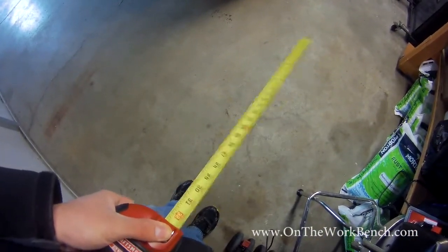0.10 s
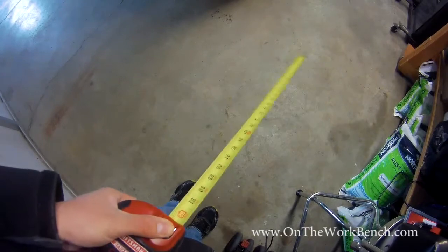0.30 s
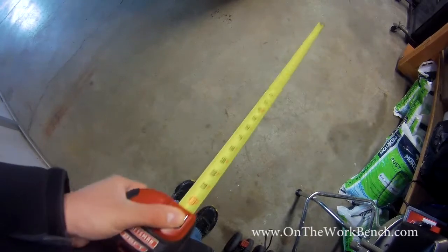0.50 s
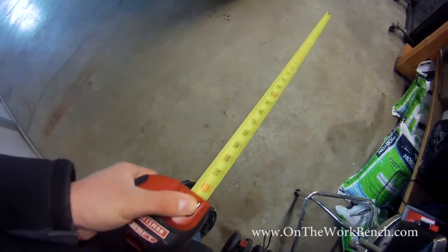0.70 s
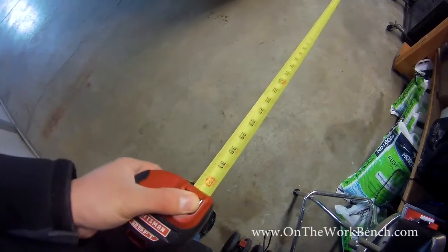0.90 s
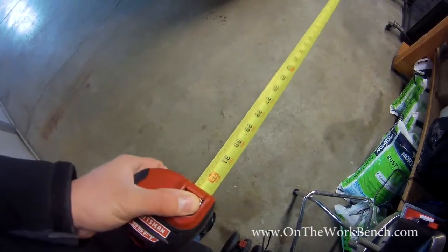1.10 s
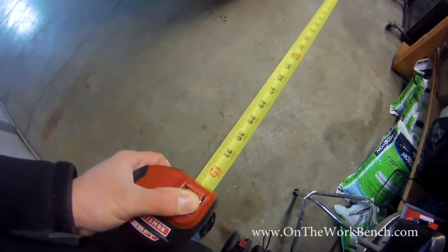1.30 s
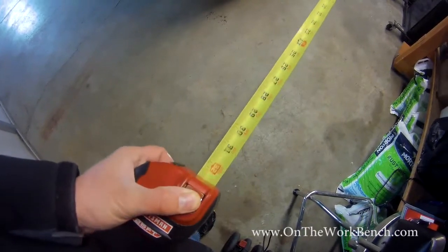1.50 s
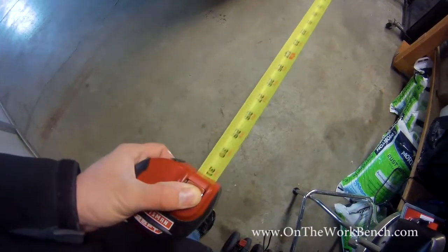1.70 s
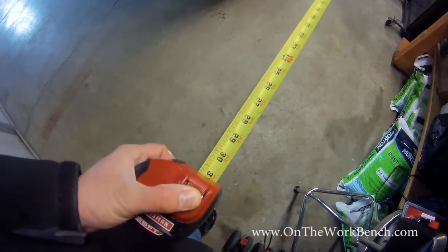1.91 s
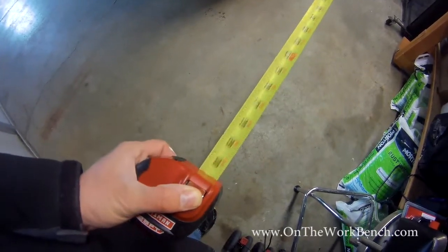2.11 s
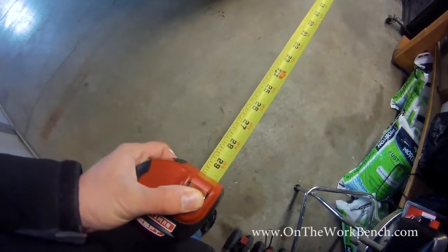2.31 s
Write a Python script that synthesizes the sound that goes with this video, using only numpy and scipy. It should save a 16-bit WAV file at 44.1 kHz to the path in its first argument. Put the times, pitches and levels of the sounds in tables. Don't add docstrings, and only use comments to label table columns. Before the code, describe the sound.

Thin metal tape blade wobbles and whips with bright snapping kinks over a low flexing drone, settles to faint ticks, then rubs home in two quiet, short spurts; concrete garage, short echo, steady hiss, hand rumble.

```python
import sys
import numpy as np
from scipy import signal
from scipy.fft import rfft, irfft, next_fast_len
from scipy.io import wavfile
from scipy.ndimage import uniform_filter1d, map_coordinates

SR = 44100
rng = np.random.default_rng(int(sys.argv[2]) if len(sys.argv) > 2 else 0)


def linear_from_db(decibels):
    return 10 ** (np.asarray(decibels, float) / 20)


def waveform_to_disk(signal):
    frames = np.transpose(np.atleast_2d(signal))
    scaled = np.clip(frames, -1, 1) * 32767
    samples = np.round(scaled).astype(np.int16)
    wavfile.write(sys.argv[1], SR, samples)


N = 110250


def unit(x):
    return x / np.sqrt(np.mean(x ** 2) + 1e-20)


def along(points, hz):
    f, v = np.transpose(points)
    return np.interp(np.log(hz + 1), np.log(f + 1), v)


def wobble(rate):
    knots = rng.standard_normal(int(N * rate / SR) + 4)
    return map_coordinates(knots, [np.arange(N) * rate / SR])


def filtered(x, response):
    m = next_fast_len(N + 8192)
    return irfft(rfft(x, m) * response(np.fft.rfftfreq(m, 1 / SR)), m)[:N]


def shaped_noise(points):
    return unit(filtered(rng.standard_normal(N), lambda hz: linear_from_db(along(points, hz))))


def resonances(hz, peaks, share):
    power = sum(linear_from_db(2 * db) / (1 + (2 * (hz - c) / width) ** 2) for c, width, db in peaks)
    return np.sqrt(1 + share * power)


def grains(rate, hz, spread, cycles, size_db):
    u = rng.random((int(N / SR * 3000), 4))
    k = np.arange(160)
    pitch = np.clip(hz * np.exp(spread * (2 * u[:, 1:2] - 1)), 1900, 14000) / SR
    size = linear_from_db(np.minimum(-size_db * np.log(u[:, 2:3]), 9))
    size = size * np.clip((rate / 3000 - u[:, 3:]) * 50, 0, 1)
    ring = size * np.sin(2 * np.pi * pitch * k) * np.exp(-k * pitch / cycles)
    ring = ring * np.minimum(k * pitch / 2, 1)
    place = (u[:, :1] * N).astype(int) + k
    return unit(np.bincount(place.ravel(), ring.ravel(), N + 160)[:N])


def patchy(x, depth_db, span_bins, span_frames):
    z = signal.stft(x, nperseg=128)[2]
    field = uniform_filter1d(rng.standard_normal(z.shape), span_bins, 0)
    field = uniform_filter1d(field, span_frames, 1)
    return unit(signal.istft(z * linear_from_db(depth_db * unit(field)), nperseg=128)[1][:N])


def swells(rows):
    t = np.arange(N) / SR
    return sum(linear_from_db(db) * np.exp(-.5 * ((t - s) / np.where(t < s, rise, fall)) ** 2)
               for s, db, rise, fall in rows)


def add(track, s, sound):
    part = track[round(s * SR):][:len(sound)]
    part += sound[:len(part)]


# frequency in Hz, level in dB per Hz.
HISS_SPECTRUM = [(15, -10.5), (30, -3), (210, -11), (430, -17), (800, -24), (2200, -31), (5000, -36),
                 (12500, -38.5), (15200, -44.5)]
# time in seconds, gain in dB.
FLOOR_GAIN = [(0, 1), (0.899, 0.5), (1.15, -2), (1.5, -3), (1.7, 0), (2.0, -0.5), (2.5, 0.5)]


def hiss():
    t = np.arange(N) / SR
    noise = unit(filtered(rng.standard_normal(N), lambda hz: linear_from_db(along(HISS_SPECTRUM, hz)) * (hz > 12)))
    whine = np.sin(2 * np.pi * 13717 * t + .4 * wobble(20)) * linear_from_db(1.5 * wobble(14))
    s, db = np.transpose(FLOOR_GAIN)
    return linear_from_db(-61.5 + np.interp(t, s, db) + .4 * wobble(1.9)) * noise + linear_from_db(-84) * whine


# frequency in Hz, decay time t60 in seconds.
GARAGE_T60 = [(300, 0.66), (2500, .4), (12000, 0.21)]


def garage(x):
    hz, t, z = signal.stft(rng.standard_normal(SR // 2), SR, nperseg=256)
    decay = linear_from_db(-60 * t / along(GARAGE_T60, hz)[:, None])
    tail = signal.istft(z * decay, SR, nperseg=256)[1]
    delayed = np.pad(x, (300, 0))
    return signal.fftconvolve(delayed, tail / np.linalg.norm(tail))[:N]


# time in seconds, level in dB.
GRIP_LEVEL = [(0, -70), (.2, -67.5), (.42, -59.5), (.75, -62.5), (1.0, -70.5), (1.5, -80.5), (1.9, -64.5),
              (2.5, -75.5)]
# frequency in Hz, level in dB per Hz.
GRIP_SPECTRUM = [(15, -20), (40, -5.5), (200, -3), (600, -10), (1500, -21.5), (3000, -60.5)]


def grip():
    s, db = np.transpose(GRIP_LEVEL)
    return linear_from_db(np.interp(np.arange(N) / SR, s, db)) * shaped_noise(GRIP_SPECTRUM)


# frequency in Hz, level in dB per Hz.
CRACK_SPECTRUM = [(800, -38), (3000, -11.5), (4800, 1.5), (8500, -8.5), (11500, -13.5), (14000, -32)]


def cracks():
    return np.tile(shaped_noise(CRACK_SPECTRUM), 2)


# fastest moment in seconds, level in dB, rise in seconds, fall in seconds.
SLIDE_SPURTS = [
    (1.72, -54.5, 0.042, 0.046),
    (1.63, -74.5, 0.024, 0.046),
    (1.86, -67, 0.078, 0.054),
    (2.2, -70.5, 0.056, 0.031),
    (2.305, -56.5, 0.056, 0.044),
    (2.4, -70, 0.01, 0.023),
]
# frequency in Hz, level in dB per Hz.
RUB_SPECTRUM = [(250, -32), (600, -5), (1200, -15), (1900, -3), (3000, -4.5), (4600, -1), (8700, -7),
                (12500, -13), (15500, -28.5)]
# frequency in Hz, width in Hz, level in dB.
SHELL_MODES = [(1830, 50, -3), (2225, 81, 2.5), (3860, 36, -5), (4040, 58, -1), (6100, 140, -2),
               (8600, 66, 5.5), (9760, 110, -10)]
# frequency in Hz, width in Hz, level in dB.
SHELL_MODES_LATER = [(1840, 80, -3), (2590, 61, -2), (4090, 71, 2), (5260, 250, 1.5), (6180, 120, 4.5),
                     (8150, 140, -3), (8940, 150, 3)]


def slide():
    rub = rng.standard_normal(N) * linear_from_db(0.98 * wobble(300) + 0.34 * wobble(39.9))

    def through(shell):
        return unit(filtered(rub, lambda hz: linear_from_db(along(RUB_SPECTRUM, hz)) * resonances(hz, shell, share=2.2)))

    grip_shift_s = 2.0
    ringing = np.where(np.arange(N) / SR < grip_shift_s, through(SHELL_MODES), through(SHELL_MODES_LATER))
    grit = grains(630, 5030, spread=.5, cycles=6.5, size_db=3.0)
    return swells(SLIDE_SPURTS) * (ringing + linear_from_db(-19.5) * grit)


# time in seconds, peak in dB, brightness in dB per octave.
EDGE_TICKS = [(.6944, -45, -3), (.7446, -47, 1), (.7524, -46, -1), (.7927, -49, 3), (.834, -53, 3),
              (.8424, -55, 10), (.8862, -56, 0), (.8944, -55, 1), (.9564, -62, -1), (.9905, -51.5, 6),
              (.9964, -56, 1), (.7375, -52, 1), (.7845, -50, -2), (.6655, -51, -3)]
# time in seconds, peak in dB, brightness in dB per octave.
BRAKE_TICKS = [
    (1.853, -55, -2),
    (2.1078, -51, 0),
    (2.394, -51, 0),
    (2.4818, -54, -4),
]
# frequency in Hz, level in dB, decay time t60 in seconds.
TICK_SHELL_MODES = [(3920, -11, 0.009), (5100, 0, 0.013), (6500, -11, 0.0085), (8020, -5, 0.011),
                    (8800, -10, .012), (11200, -8, .01), (12070, -12, .01)]


def ticks():
    out, t, grit = np.zeros(N), np.arange(SR // 20) / SR, cracks()
    for s, db, tilt in list(EDGE_TICKS) + list(BRAKE_TICKS):
        ring = np.zeros(len(t))
        for hz, level, t60 in TICK_SHELL_MODES:
            strike, detune = rng.standard_normal(2)
            mode_db = level + 2.0 * strike + np.clip(tilt, -5, 5) * np.log2(hz / 5000)
            ring += linear_from_db(mode_db - 60 * t / t60) * np.sin(2 * np.pi * hz * (1 + .015 * detune) * t)
        click = 1.33 * grit[int(s * SR):][:len(t)] * linear_from_db(-60 * t / 0.017)
        add(out, s, linear_from_db(db - 9.5) * (ring * (1 - np.exp(-t / 0.00024)) + click))
    return out


# time in seconds, peak in dB, pitch in Hz, decay time t60 in seconds.
KINK_SNAPS = [(0.0398, -45, 3500, 0.012), (0.1166, -51.5, 3830, 0.011), (0.162, -47.5, 3350, 0.014),
              (0.194, -30, 2500, 0.013), (0.1945, -29.5, 3170, 0.012), (0.2014, -29.5, 4630, 0.011),
              (0.346, -38, 4950, 0.011), (0.3516, -37, 4870, 0.012), (0.384, -29, 3050, 0.013),
              (0.397, -20.5, 3034, 0.012), (0.412, -11, 2986, 0.01), (0.4394, -25, 3060, 0.012),
              (0.4532, -24.5, 4210, 0.013), (0.4877, -25.5, 4210, 0.012), (0.5571, -23, 5480, 0.0085),
              (0.6118, -31, 2510, 0.015), (0.607, -36, 3200, 0.01), (0.6168, -36, 3340, 0.012),
              (0.6644, -38.5, 2490, 0.0096), (0.6864, -35, 3320, 0.0087), (0.7791, -47, 2530, 0.012)]
# time in seconds, peak in dB, pitch in Hz,
# decay time t60 in seconds.
CROWDED_SNAPS = [(.2012, -35, 2870, 0.014), (.2025, -35, 6400, .01), (.2045, -34.5, 4800, 0.011),
                 (.217, -35.5, 10200, 0.013), (.219, -39, 3840, 0.015), (.232, -35, 4830, .01),
                 (.248, -35.5, 3200, .012), (.3445, -40, 3100, .01), (.3455, -39.5, 8800, 0.012),
                 (.4122, -16.5, 2485, 0.012), (.4165, -27.5, 8650, .012), (.423, -20.5, 6900, 0.016),
                 (.4245, -24, 3020, 0.015), (.429, -21.5, 6660, 0.011), (.4305, -24, 3050, 0.01),
                 (.446, -29, 2940, 0.015), (.447, -23, 2160, 0.014), (.4545, -28, 6150, .012),
                 (.462, -16, 8270, 0.011), (.4865, -25.5, 2480, .014), (.502, -29, 7800, 0.0102),
                 (.54, -34, 2600, 0.017), (.6165, -37, 4760, .015), (.6235, -36.5, 3200, .012),
                 (.6215, -40.5, 7160, 0.016), (.631, -39, 6500, 0.016), (.6715, -47, 7100, .01),
                 (.6945, -46, 7550, 0.012), (.7535, -50, 5100, .016)]
# time in seconds, peak in dB, pitch in Hz, decay time t60 in seconds.
STEEL_PINGS = [
    (.118, -66, 11000, .02),
    (1.84, -53, 5100, .02),
    (1.853, -46.5, 4124, .03),
    (2.108, -55, 5200, .012),
    (2.326, -56, 4150, .025),
    (2.396, -58, 4150, .02),
    (2.482, -55, 5150, .012),
]


def snaps():
    out, t, grit = np.zeros(N), np.arange(SR // 10) / SR, cracks()
    for s, db, hz, t60 in list(KINK_SNAPS) + list(CROWDED_SNAPS) + list(STEEL_PINGS):
        tone = np.sin(2 * np.pi * hz * t) + .35 * np.sin(2 * np.pi * hz * 1.22 * t)
        tone = tone * linear_from_db(-60 * t / max(t60, .003)) * (1 - np.exp(-t / .0006))
        crack = 0.17 * grit[int(s * SR):][:len(t)] * linear_from_db(-60 * t / 0.0057)
        pop = tone + crack
        add(out, s, linear_from_db(db - 2.5) * pop)
        add(out, s + .0021, linear_from_db(db - 4.5) * pop)
    thump = linear_from_db(-49 - 60 * t / 0.18) * np.sin(2 * np.pi * 45 * t)
    add(out, 0.35, thump * np.cos(np.pi * t * 5))
    return out


# frequency in Hz, level in dB per Hz.
BODY_SPECTRUM = [(100, -28), (250, -1.5), (700, -0.5), (1500, -3), (2200, -0.5), (3500, -29)]
# peak time in seconds, level in dB, rise in seconds, fall in seconds.
SLOW_FLEXES = [
    (.03, -67, 0.031, 0.025),
    (.22, -60, .02, 0.042),
]


def drone(power):
    fade = linear_from_db(-120 * np.arange(SR) / SR / 0.77)
    held = np.abs(signal.fftconvolve(power, fade / fade.sum())[:N])
    level = linear_from_db(-30) * held ** (0.76 / 2)
    return (level + swells(SLOW_FLEXES)) * shaped_noise(BODY_SPECTRUM)


# start in seconds, level in dB, hold in seconds, decay time t60 in
# seconds, brightness in dB per octave.
CLATTER_BOUTS = [(0, -56.5, 0.024, .15, -1), (.039, -58.5, 0.015, 0.19, 1), (0.118, -64, 0.017, 0.22, -1.5),
                 (0.158, -52.5, 0.047, 0.22, -2.5), (0.192, -44, .015, 0.46, -2),
                 (0.203, -45, 0.017, 0.35, 2), (0.212, -42, 0.032, 0.22, 3),
                 (0.257, -48.5, .012, 0.23, -4.5), (0.342, -47.5, .01, 0.23, 3),
                 (0.351, -43.5, 0.02, 0.34, 1.5), (0.383, -39.5, 0.012, 0.5, -4),
                 (0.399, -36, 0.023, .2, -0.5), (0.41, -29, 0.015, 0.18, 1), (0.442, -38, .012, .2, -1.5),
                 (0.451, -32.5, 0.012, .25, 0.5), (0.48, -36.5, 0.023, 0.373, -1.5),
                 (0.532, -45.5, .012, .15, -3), (0.547, -45, 0.027, .07, -1.5),
                 (0.61, -51, 0.029, 0.12, -1), (0.661, -57, .01, .1, -1), (0.683, -55.5, 0.013, 0.23, -1),
                 (0.739, -61, 0.019, 0.21, 1.5), (0.775, -58.5, .025, 0.15, -3),
                 (0.835, -66, .02, .25, 0.5), (0.882, -67, 0.012, 0.22, 2), (0.957, -72.5, .01, 0.17, 1),
                 (.989, -67, 0.011, 0.14, -2)]
# frequency in Hz, level in dB per Hz.
BLADE_SPECTRUM = [(80, -49.5), (200, -23), (900, -23.5), (1600, -12), (2500, -2.5), (6800, -2),
                  (11200, -7.5), (14500, -13), (15700, -25)]
# frequency in Hz, width in Hz, level in dB.
BLADE_MODES = [(2450, 89, -3.5), (2930, 140, -14.5), (4160, 110, 2), (5330, 35, -3.5), (6120, 45, -5),
               (6660, 53, 2.5), (7150, 30, -1.5), (8700, 37, -2)]


def rattle():
    rush = rng.standard_normal(N) * linear_from_db(0.4 * wobble(150))
    steel = unit(filtered(rush, lambda hz: linear_from_db(along(BLADE_SPECTRUM, hz)) * resonances(hz, BLADE_MODES, share=0.91)))
    steel = steel + linear_from_db(-9) * grains(700, 5800, spread=.6, cycles=8.5, size_db=3.0)
    steel = patchy(steel, 2.4, span_bins=2, span_frames=9)
    colours = [unit(filtered(steel, lambda hz: ((hz + 2500) / 4500) ** k)) for k in (-1.4, 0, 1.4)]
    power, t = np.zeros((N, 3)), np.arange(SR // 2) / SR
    for s, db, hold, t60, tilt in CLATTER_BOUTS:
        attack = np.minimum(t / .002, 1)
        shape = attack * linear_from_db(db - 60 * np.maximum(t - hold, 0) / max(t60, .02))
        lean = np.clip(tilt / 6, -1, 1)
        add(power, s, np.outer(shape ** 2, [max(-lean, 0), 1 - abs(lean), max(lean, 0)]))
    total = power.sum(axis=1)
    clatter = np.sum(power.T * colours, axis=0) / np.sqrt(total + 1e-20)
    return linear_from_db(0.7 * wobble(60)) * clatter + drone(total)


def scene():
    tape = rattle() + slide() + snaps() + ticks()
    return np.tile(tape + linear_from_db(-14) * garage(tape) + hiss() + grip(), (2, 1))


def top_cut(x):
    return signal.sosfilt(signal.butter(12, 15720, fs=SR, output="sos"), x)


def record(dry):
    band = np.array([filtered(side, lambda hz: (1 - np.tanh((hz - 15680) / 60)) / 2) for side in dry])
    return top_cut(band)


dry = scene()
out = record(dry)
waveform_to_disk(out)
```